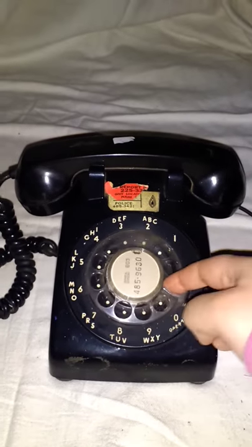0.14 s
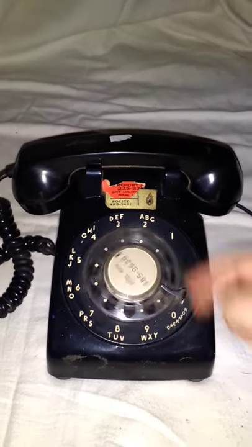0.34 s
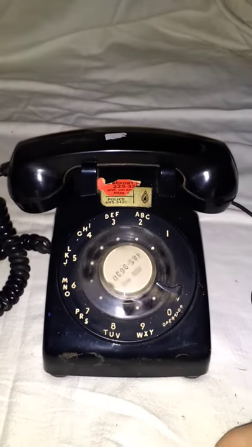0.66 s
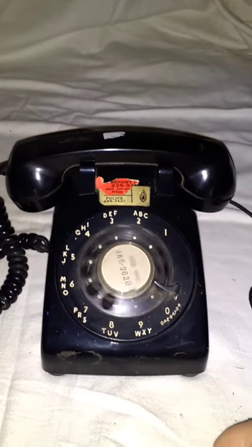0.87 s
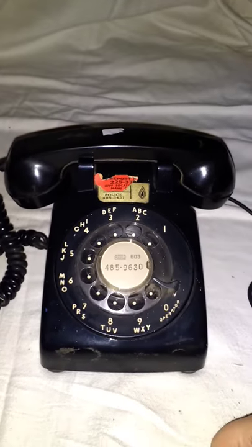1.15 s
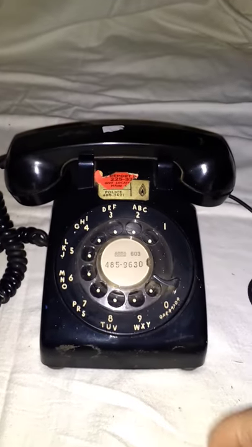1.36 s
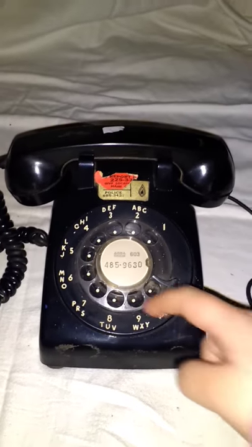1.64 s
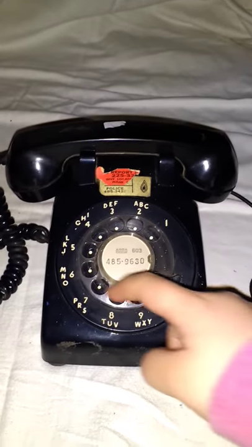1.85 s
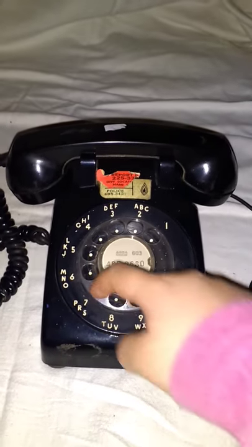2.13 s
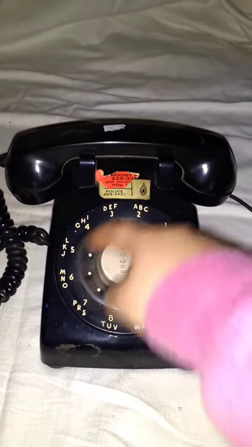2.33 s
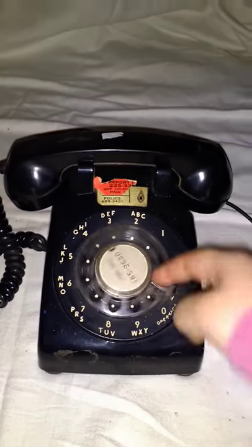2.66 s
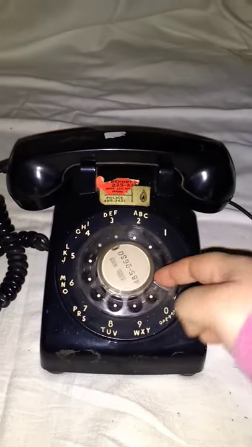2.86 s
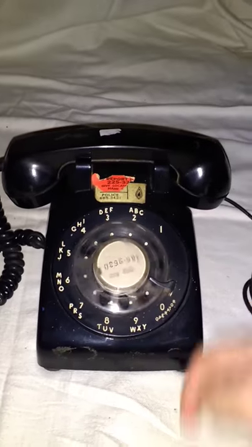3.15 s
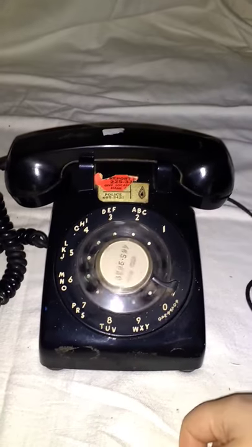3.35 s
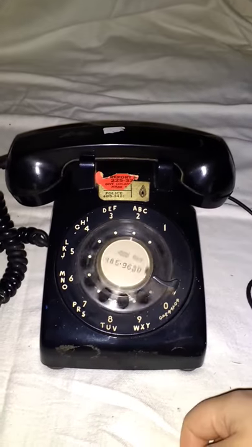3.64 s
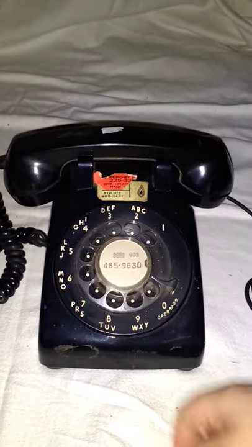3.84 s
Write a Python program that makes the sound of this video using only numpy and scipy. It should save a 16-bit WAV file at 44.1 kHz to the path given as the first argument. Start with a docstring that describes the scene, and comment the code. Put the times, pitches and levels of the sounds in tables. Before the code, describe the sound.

A telephone dial chatters back, clicks, is wound with a scrape, then returns again.

```python
"""A quiet room, a stereo microphone close to a rotary telephone dial.
The dial runs back, is wound up by a finger, and runs back again. On each return the gears whir and
the pulse cam loads them about 19 times a second, so that their teeth chatter. The wheel hits its
stop with a sharp click, and the governor coasts on for a tenth of a second."""
import sys
import numpy as np
from scipy import signal
from scipy.fft import rfft, irfft, next_fast_len
from scipy.io import wavfile
from scipy.ndimage import map_coordinates

SR = 44100
rng = np.random.default_rng(int(sys.argv[2]) if len(sys.argv) > 2 else 0)


def unload_audio(sound):
    """Save the sound as a 16-bit wav file, at the path given as the first command line argument."""
    columns = np.transpose(np.atleast_2d(sound))
    # keep every value between -1 and 1, then stretch to whole-number steps
    steps = np.round(np.clip(columns, -1, 1) * 32767)
    wavfile.write(sys.argv[1], SR, steps.astype(np.int16))


N = 176400

# Levels in all tables are relative.
# beats of the pulse cam: centre t/s, length/s, chatter level/dB, rattle level/dB
CAM_BEATS = [(0.215, 0.01, -44.0, -48), (0.261, 0.012, -36, -47), (0.313, 0.0068, -36.5, -48),
             (0.369, 0.015, -37.5, -46.5), (0.419, 0.015, -34, -48), (0.473, 0.021, -38.5, -47.5),
             (0.526, 0.02, -34, -48.5), (0.581, 0.013, -35, -47.5), (0.63, 0.013, -35.5, -49.5),
             (0.682, 0.014, -35.5, -49), (0.736, 0.028, -38, -49.5), (0.783, 0.014, -37, -50.5),
             (0.839, 0.017, -36, -48.3), (0.89, 0.034, -38, -47.5), (0.943, 0.036, -37.5, -49),
             (0.99, 0.027, -35, -47), (1.043, 0.018, -35, -46.5), (1.1, 0.023, -37.1, -47.5),
             (2.918, 0.032, -42, -50), (2.972, 0.015, -39.5, -49.5), (3.024, 0.023, -38.5, -49),
             (3.076, 0.0091, -35.5, -46.5), (3.125, 0.018, -33.5, -47), (3.183, 0.016, -36, -49),
             (3.233, 0.017, -36.5, -49.5), (3.288, 0.017, -34.5, -49.5), (3.337, 0.016, -36, -48),
             (3.388, 0.013, -34.5, -50), (3.44, 0.029, -38.5, -48), (3.495, 0.025, -37.7, -48),
             (3.547, 0.021, -37.5, -47), (3.593, 0.028, -36.5, -48), (3.651, 0.016, -35.5, -48.5),
             (3.706, 0.017, -37.5, -47.0)]
# returns of the wheel: release t/s, stop t/s, coasting/s, whir level/dB, click level/dB, thud level/dB
WHEEL_RETURNS = [(0.186, 1.1385, 0.096, -43, -25.5, -21.5), (2.884, 3.7286, 0.096, -43.5, -26, -20.5)]
# spectrum of the running gears: f/Hz, level/dB
GEAR_SPECTRUM = [(30, -55), (70, -78), (150, -26.5), (230, -15), (310, -4), (390, 0.5), (470, -0.5),
                 (540, -11), (630, -4), (760, -18), (880, -25.5), (1010, -9.5), (1200, -38.5), (1450, -21),
                 (1900, -25), (4000, -44)]
# spectrum of the scraping clutch: f/Hz, level/dB
SCRAPE_SPECTRUM = [(500, -16), (1000, -13), (1900, 2), (2650, 8.5), (3100, 2.5), (3650, 1), (4130, 5.5),
                   (4450, -6.5), (4770, 0), (5300, -7), (6200, -2), (8000, -5), (10000, -11.5),
                   (15500, -17)]
RATTLE_OVERHANG_S = 0.0026


def cam_chatter():
    """At each cam beat the gear teeth strike the case in a quick uneven train, and loose metal rattles."""
    # modes of the plastic case: f/Hz, width/Hz, level/dB, left minus right/dB
    case_modes = [(417, 115, 0.5, 16.5), (734, 234, -3, 11.5), (1026, 40.5, 0, 1), (1453, 75, -7, -10),
                  (2704, 210, -14.5, -15)]
    # loose metal: f/Hz, level/dB
    rattle_spectrum = [(500, -47), (1300, -5), (1900, -1.5), (2400, 6.5), (2720, 6.5), (3100, -2),
                       (3600, 0), (4150, 5), (4450, -8), (4750, -2.5), (5300, -6.5), (6000, 4),
                       (7000, -8.5), (7850, 0), (8700, -5), (9800, -9), (12000, -9.5), (15500, -13)]
    tooth_hz, count, rise_s = 694, 4000, 0.00069
    times = np.cumsum(np.exp(0.13 * rng.standard_normal(count))) / tooth_hz
    strengths = amp(3.15 * rng.standard_normal(count))
    teeth = np.bincount((times * SR).astype(int), strengths, N)[:N]

    def case(f):
        """The case resonates, rolling off below 150 Hz and above 3500 Hz."""
        response = 0
        for k, (hz, width, db, pan) in enumerate(case_modes):
            resonance = 1j * f * width / (hz * hz - f * f + 1j * f * width)
            response += (-1) ** k * amp([[db + pan / 2], [db - pan / 2]]) * resonance
        return response / (1 + (f / 3500) ** 4) * f * f / (f * f + 150 ** 2)

    load, shake = np.zeros((2, N))
    for centre, length, chatter_db, rattle_db in CAM_BEATS:
        start, end = centre - length / 2, centre + length / 2
        load += amp(chatter_db + 1) * gate(start, end, rise_s, fall_s=0.0029)
        shake += amp(rattle_db + 2.5) * gate(start, end + RATTLE_OVERHANG_S, rise_s, fall_s=0.0078)
    return load * unit(filtered(teeth, case)) + shake * texture(rattle_spectrum, grainy=True)


def wheel_stop():
    """The wheel hits its stop and bounces: a crack, roughly ringing metal and a thud of the housing."""
    # contacts of one stop: delay/s, level/dB
    bounces = [(0, -1), (.004, -7.5), (.013, -2.5)]
    # modes of the stop and dial plate: f/Hz, level/dB, t60/s
    metal_modes = [(1033, 1, 0.084), (2133, -3, .06), (2600, -6.5, 0.093), (4170, -19, 0.055),
                   (4260, -6.5, 0.094), (4750, -12, 0.12), (5760, -10, .03), (6700, -9, 0.034),
                   (6700, -7, 0.034), (7800, -8, 0.034)]
    # hollow modes of the housing: f/Hz, level/dB
    housing_modes = [(215, -12), (385, -3), (450, -2), (505, -0.5), (690, -10)]
    # crack of the impact: f/Hz, level/dB
    crack_spectrum = [(300, 10.5), (1000, 3), (3500, 2), (4200, 16.5), (5000, -5), (5800, 12), (6900, 2),
                      (8200, -0.5), (10000, -5.5), (15500, -9)]
    ring, crack = np.zeros(N + SR), np.zeros(N)
    t = np.arange(SR // 4) / SR
    knots, thud_lag_s = np.linspace(0, t[-1], 64), 0.00303
    mode = lambda hz, t60: np.sin(2 * np.pi * hz * t) * fade(t, t60)
    for _, stop, _, _, click_db, thud_db in WHEEL_RETURNS:
        for delay, bounce_db in bounces:
            force = amp(click_db + bounce_db)
            crack += force * strike(stop + delay, t60=0.03)
            for hz, db, t60 in metal_modes:
                roughness = amp(6.5 * np.interp(t, knots, rng.standard_normal(len(knots))))
                partial = roughness * mode(hz + rng.normal(0, 19.8), t60)
                ring[int((stop + delay) * SR):][:len(t)] += force * amp(db - 10) * partial
        for k, (hz, db) in enumerate(housing_modes):
            thud = amp(thud_db + db) * (-1) ** k * mode(hz, t60=0.051)
            ring[int((stop + thud_lag_s) * SR):][:len(t)] += thud
    return ring[:N] + crack * texture(crack_spectrum)


def governor():
    """The gear train whirs and fizzes through each return; past the stop it coasts and fades."""
    # fizz of the gear train: f/Hz, level/dB
    fizz_spectrum = [(500, -6), (1400, 13), (1900, -5.5), (2650, 9), (3600, -6), (4200, 5), (5300, -11.5),
                     (6200, -4), (7900, -3.5), (10000, -15), (15500, -18)]
    whir_db_per_s, fizz_db_per_s = -37, -82
    whir, fizz = np.zeros((2, N))
    for release, stop, coasting, db, _, _ in WHEEL_RETURNS:
        running = gate(release, stop + coasting, rise_s=0.021, fall_s=0.017)
        past_stop = np.maximum(since(stop), 0)
        whir += amp(db + whir_db_per_s * past_stop) * running
        fizz += amp(db - 8.5 + fizz_db_per_s * past_stop) * running
    flutter = amp(2 * wobble(70))
    return whir * flutter * texture(GEAR_SPECTRUM) + fizz * texture(fizz_spectrum, grainy=True)


def winding():
    """A finger pulls the wheel round against the spring: gears rumble and the clutch scrapes unevenly."""
    # course of the pull: t/s, scrape level/dB, rumble level/dB
    pull = [(2.12, -74, -67), (2.198, -62.5, -45.5), (2.22, -54, -45), (2.354, -44.5, -40.5),
            (2.38, -53, -47.5), (2.404, -43, -41.5), (2.428, -54.5, -46.5), (2.456, -42, -39.5),
            (2.472, -49, -44), (2.512, -43, -42.5), (2.53, -53, -41.5), (2.554, -43.5, -43.5),
            (2.58, -52.5, -40), (2.604, -43, -40), (2.628, -57.5, -41.5), (2.678, -41.5, -44),
            (2.714, -59, -53), (2.8, -87, -70)]
    # gears being wound: f/Hz, level/dB
    rumble_spectrum = [(30, -55), (80, -36), (150, -25), (250, -8.5), (370, 4.5), (470, 2.5), (640, 0),
                       (860, -11.5), (1020, -4.5), (1230, -25.5), (1480, -13.5), (1900, -22), (4000, -60)]
    times, scrape_db, rumble_db = np.transpose(pull)
    envelope = lambda db: amp(np.interp(since(0), times, db + 1.5, left=-120, right=-120))
    flutter = unit(amp(wobble(130)))
    scrape = flutter * envelope(scrape_db) * texture(SCRAPE_SPECTRUM, grainy=True)
    return scrape + envelope(rumble_db) * texture(rumble_spectrum)


def wheel_knocks():
    """The finger wheel knocks in its play: a dull bump with a small tick."""
    # light knocks: t/s, bump level/dB, tick level/dB
    knocks = [(.003, -43.5, -50), (0.084, -56, -52.5), (.141, -51.5, -52.5), (0.182, -29.5, -64),
              (.968, -30, -52), (1.952, -49.5, -74), (2.259, -42.5, -62), (2.594, -40, -51),
              (2.657, -33, -50), (2.676, -32.5, -45), (2.825, -47.5, -61), (2.885, -37, -52),
              (3.612, -34.5, -52)]
    bump = sum(amp(db) * strike(start, t60=0.089) for start, db, _ in knocks)
    tick = sum(amp(db) * strike(start, t60=0.042) for start, _, db in knocks)
    return bump * texture(GEAR_SPECTRUM) + tick * texture(SCRAPE_SPECTRUM, grainy=True)


def gear_hum():
    """Turning slowly, at the start of winding and when coasting, the gears give a wavering note."""
    # gliding notes: start t/s, end t/s, first f/Hz, last f/Hz, level/dB
    notes = [(1.166, 1.241, 332.8, 354.7, -44.5), (2.212, 2.267, 239.2, 264.4, -44.5),
             (3.76, 3.79, 294.3, 289, -41), (3.822, 3.836, 342, 372, -44.5)]
    hum = np.zeros(N)
    for start, end, first_hz, last_hz, db in notes:
        hz = np.interp(since(0), [start, end], [first_hz, last_hz]) * (1 + 0.05 * wobble(60))
        envelope = amp(db + 1.5 * wobble(90)) * gate(start, end, rise_s=0.0097, fall_s=0.013)
        hum += envelope * np.sqrt(2) * np.sin(2 * np.pi * np.cumsum(hz) / SR)
    return hum


def bright_rasps():
    """Short bright rasps: ratchet strokes of the clutch during winding, and one on each return beat."""
    # ratchet strokes of the clutch: centre t/s, length/s, level/dB
    ratchet_strokes = [(2.228, .008, -51.5), (2.295, .04, -53), (2.345, .03, -52), (2.403, 0.018, -51.5),
                       (2.456, 0.02, -51), (2.506, .026, -50), (2.553, .022, -48.5), (2.604, .02, -51),
                       (2.652, 0.016, -47), (2.68, .01, -47)]
    # spectrum of a rasp: f/Hz, level/dB
    rasp_spectrum = [(3000, -27), (5500, -5), (6300, -6), (8000, -0.5), (9500, -14), (11700, -0.5),
                     (13500, -4), (15500, 1)]
    beat_rasps = [(centre + RATTLE_OVERHANG_S / 2, length + RATTLE_OVERHANG_S, db - 4.5)
                  for centre, length, _, db in CAM_BEATS]
    envelope = sum(amp(db) * gate(centre - length / 2, centre + length / 2, rise_s=0.002, fall_s=0.0023)
                   for centre, length, db in list(ratchet_strokes) + beat_rasps)
    return envelope * texture(rasp_spectrum, grainy=True)


def clutch_song():
    """While the wheel is pulled fastest, friction makes the clutch spring sing in a narrow band."""
    # singing spring: f/Hz, level/dB
    spring_spectrum = [(3700, -40), (3950, -12), (4070, 1), (4160, -4), (4250, 5), (4400, -16), (4760, -11),
                       (5100, -42)]
    fast_pull = gate(2.27, 2.5, rise_s=0.037, fall_s=0.037)
    return amp(-53.5) * fast_pull * texture(spring_spectrum, grainy=True)


def room_reverb(x):
    """The furnished room gives a short, soft answer that reaches the microphone 4 ms late."""
    t = np.arange(SR // 3) / SR
    tail = rng.standard_normal((2, len(t))) * fade(t, t60=0.27) * (t > 0.004)
    return amp(-13.5) * signal.fftconvolve(x, tail / np.linalg.norm(tail[0]), axes=1)[:, :N]


def room_tone():
    """A faint, steady low rush lies behind the dial."""
    # the quiet room: f/Hz, level/dB
    room_spectrum = [(15, -66), (25, -24), (53, -22.5), (93, -1.5), (152, -5), (267, -6.5), (289, -12.5),
                     (359, -11.5), (389, -14), (895, -18), (1410, -24), (2920, -24), (3530, -27),
                     (4260, -25), (15500, -36.5)]
    return amp(-55.5) * texture(room_spectrum)


def texture(spectrum, grainy=False):
    """Stereo noise of rms 1; if grainy, dense tiny impacts that ring briefly in the dial's frame."""
    # side signal against mid: f/Hz, level/dB
    stereo_width = [(50, -7.5), (150, 0), (300, -15), (1100, -17), (1520, -4), (2200, -9), (2850, -4.5),
                    (3300, -10), (4300, -25), (7000, -5.5), (9000, -6.5), (15000, -22.5)]
    # balance at the microphone: f/Hz, left minus right/dB
    balance = [(100, -2.5), (400, -2), (520, 4), (720, 3.5), (1100, 0.5), (1500, -3.5), (2200, 2),
               (2750, -3), (4000, 0.5)]
    grains_per_s = 3500
    x = rng.standard_normal((2, N))
    if grainy:
        grains = x * (rng.random(N) < grains_per_s / SR) * amp(rng.standard_normal(N))
        t = np.arange(SR // 10) / SR
        frame = rng.standard_normal(len(t)) * fade(t, t60=0.039)
        ringing = signal.fftconvolve(grains, frame[None] / np.linalg.norm(frame), axes=1)[:, :N]
        x = grains + amp(2.5) * ringing
    mid, side = x[0], filtered(x[1], lambda hz: amp(along(stereo_width, hz)))
    colour = lambda hz: amp(along(spectrum, hz) + np.outer([0.5, -0.5], along(balance, hz)))
    return unit(filtered(np.array([mid + side, mid - side]), colour))


def amp(db):
    """Decibels to gain."""
    return 10 ** (np.asarray(db) / 20)


def unit(x):
    """Scale to rms 1."""
    return x / np.sqrt(np.mean(x ** 2) + 1e-20)


def along(points, hz):
    """Interpolate (f/Hz, value) points on a log frequency axis."""
    freqs, values = np.transpose(points)
    return np.interp(np.log(hz + 1), np.log(freqs + 1), values)


def filtered(x, response):
    """Filter x by a complex function of frequency."""
    size = next_fast_len(N + SR // 2)
    return irfft(rfft(x, size) * response(np.fft.rfftfreq(size, 1 / SR)), size)[..., :N]


def wobble(rate):
    """A smooth random curve, rate knots a second."""
    return map_coordinates(rng.standard_normal(int(N * rate / SR) + 4), [np.arange(N) * rate / SR])


def since(start):
    """Seconds since start, for each sample."""
    return np.arange(N) / SR - start


def gate(start, end, rise_s, fall_s):
    """Full between start and end, with exponential flanks."""
    return np.exp(np.minimum(since(start), 0) / rise_s - np.maximum(since(end), 0) / fall_s)


def fade(t, t60):
    """A fall of 60 dB every t60 seconds."""
    return np.exp(-np.log(1000) * t / t60)


def strike(start, t60):
    """An envelope that jumps up at start and dies away."""
    return (since(start) >= 0) * fade(np.abs(since(start)), t60)


def scene():
    """The dial close up, too small to radiate deep bass, with the room behind it."""
    dial = cam_chatter() + governor() + gear_hum() + winding() + clutch_song()
    dial += bright_rasps() + wheel_knocks() + wheel_stop()
    dial = signal.sosfilt(signal.butter(3, 126, 'highpass', fs=SR, output='sos'), dial)
    return dial + room_reverb(dial) + room_tone()


def record(dry):
    """The two microphone channels differ in phase and keep nothing above the band limit."""
    # phase between the channels: f/Hz, lead of the left/rad
    phase_lead = [(0, .8), (400, 1), (620, 1.8), (700, -.5), (1100, -.6), (1250, .2), (1420, -.4),
                  (1580, -3.1), (1850, -3.7), (2500, -4.7), (2950, -7.5), (3620, -9.4), (5400, -15.7),
                  (7200, -22), (9000, -28.3), (9600, -31.2), (10100, -30.8), (10400, -28.4), (11050, -28.2),
                  (11550, -25.6), (12250, -25), (13200, -22), (15500, -16.6)]
    band_limit_hz = 15800
    phase = lambda hz: np.outer([0.5, -0.5], np.interp(hz, *np.transpose(phase_lead)))
    return filtered(dry, lambda hz: np.exp(1j * phase(hz)) * (hz < band_limit_hz))


dry = scene()
out = record(dry)
unload_audio(out)
```